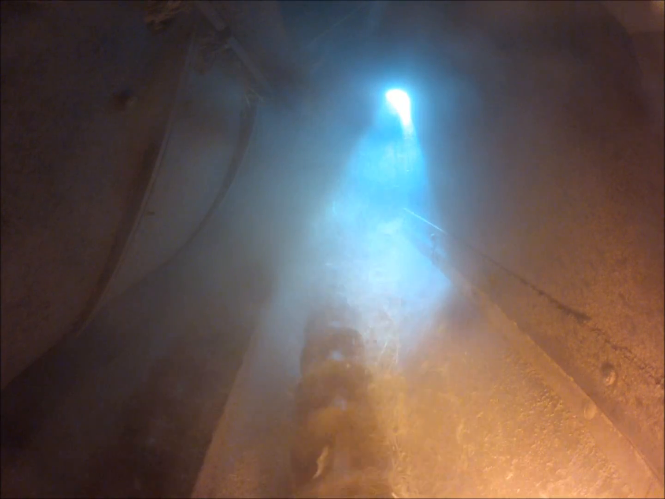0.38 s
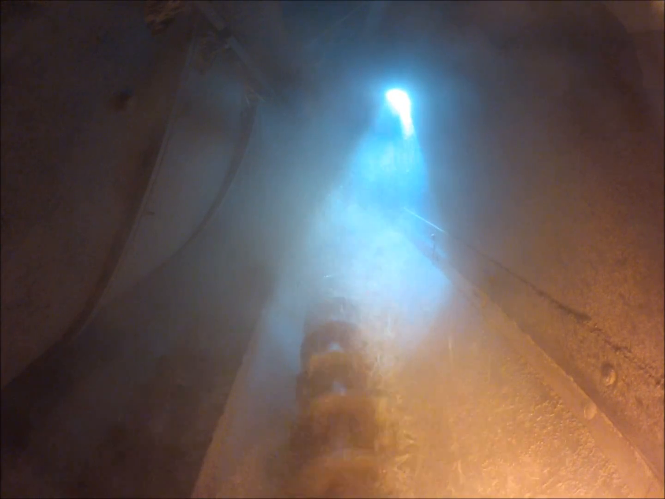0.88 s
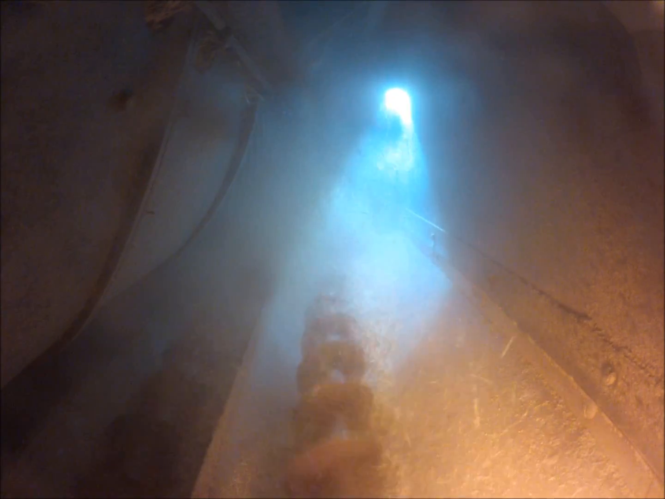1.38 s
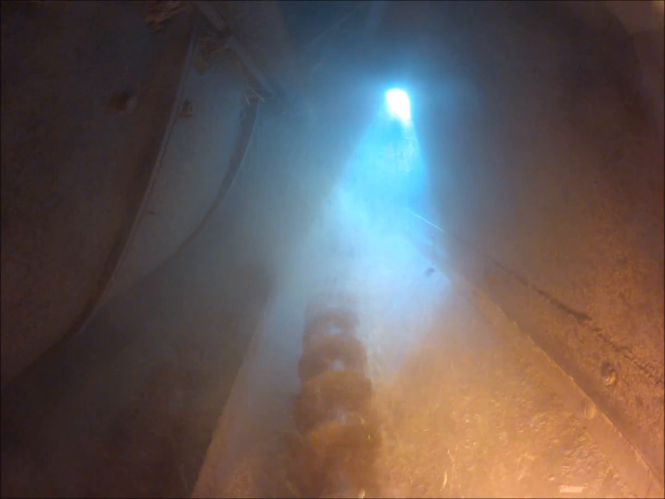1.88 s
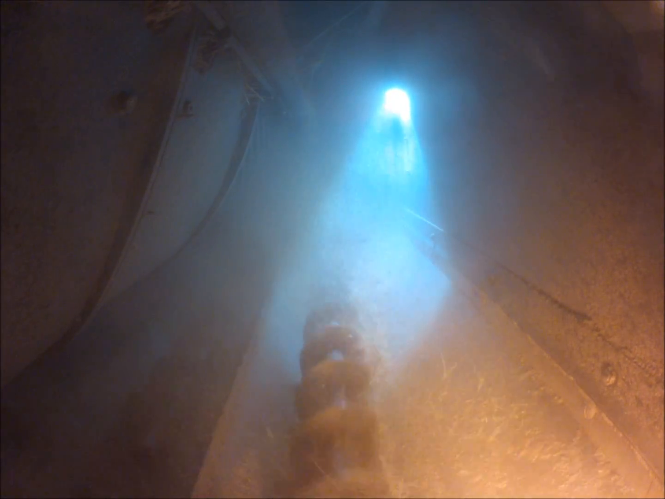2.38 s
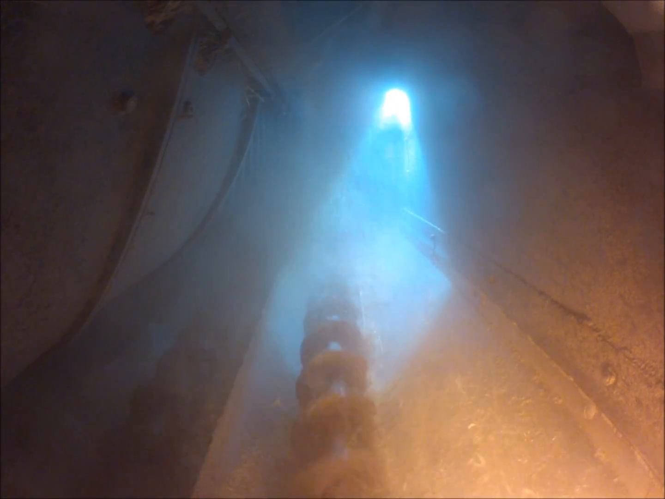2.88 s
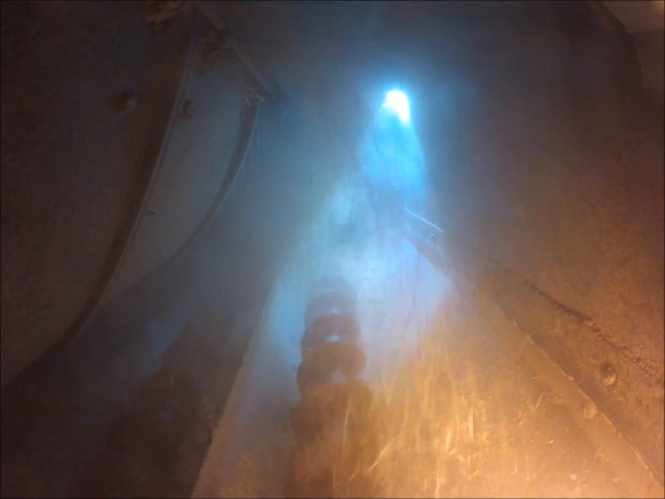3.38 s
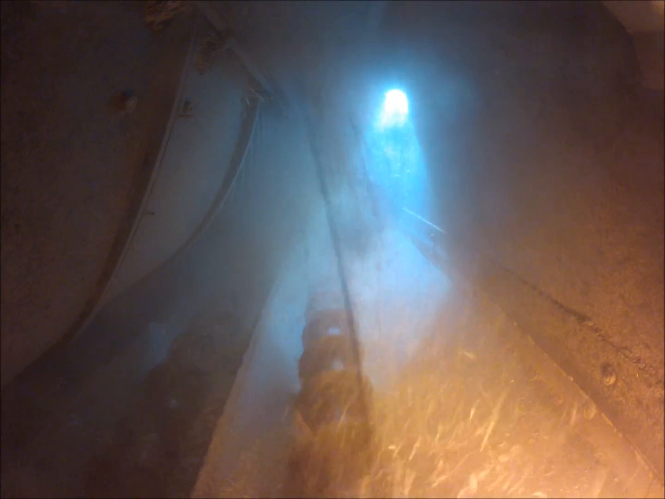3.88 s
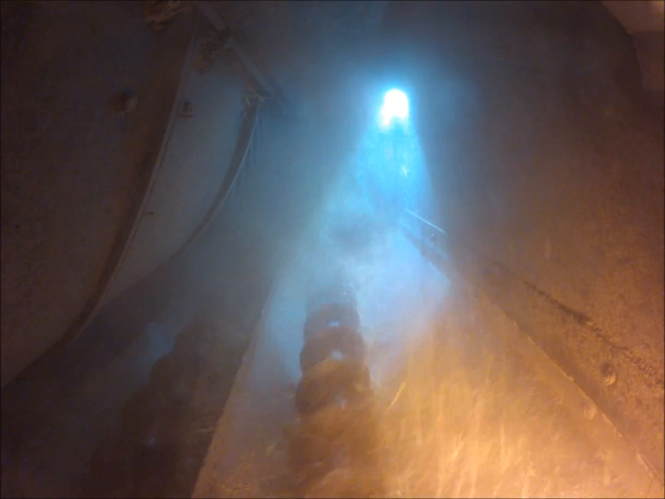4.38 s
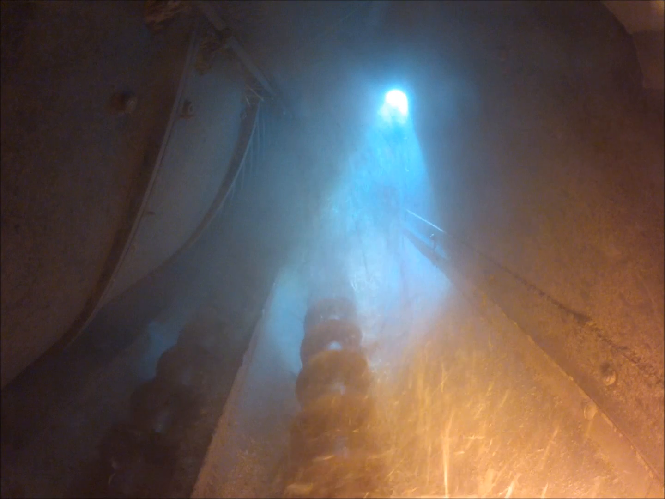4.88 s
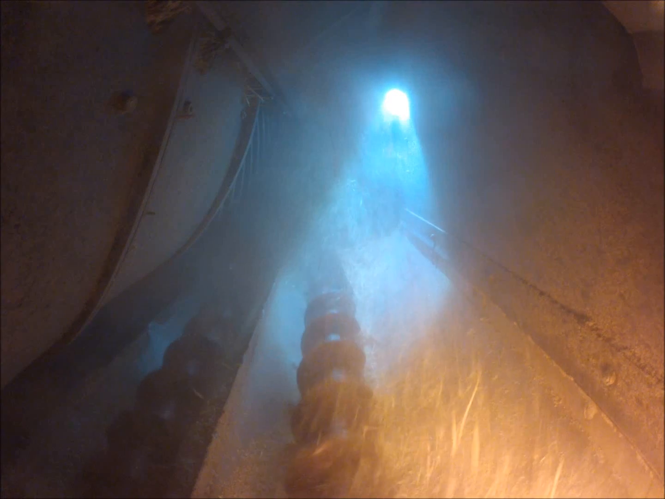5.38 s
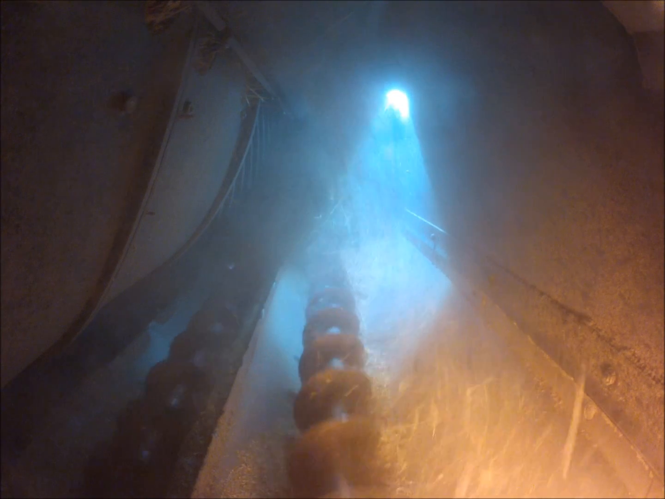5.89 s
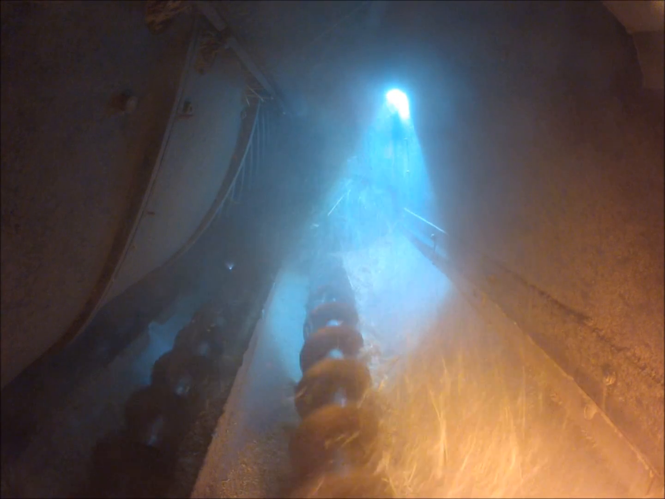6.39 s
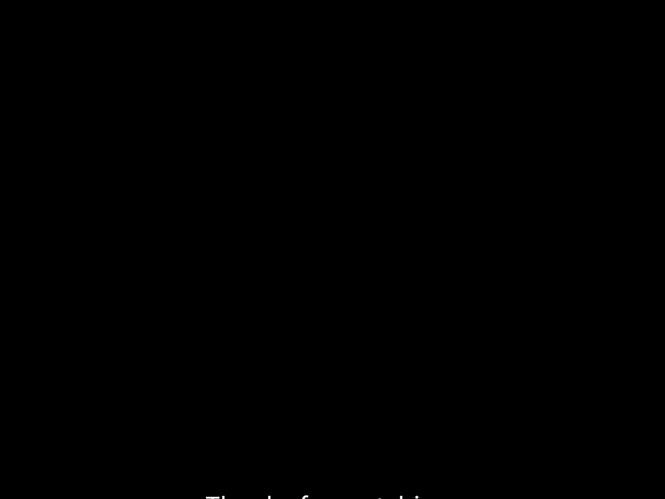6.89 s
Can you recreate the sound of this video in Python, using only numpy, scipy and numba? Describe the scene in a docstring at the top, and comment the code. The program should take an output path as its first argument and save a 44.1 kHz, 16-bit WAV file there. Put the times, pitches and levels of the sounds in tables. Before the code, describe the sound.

A small sealed microphone sits in a steel auger chamber, hearing a continuous boxy drone and a fine dry rain of chaff and grain. Single kernels crack hard against its housing, joined by several blunt overloaded blows early on. Level pumps down after hits and recovers. Gradually the patter weakens and the roar fades, dipping once near the end before cutting off.

```python
"""Inside a running thresher: a small sealed recorder starts at low gain, so the sound begins quiet.
Drum and augers drone through steel panels (shaped noise and wavering tones) and grain patters (ringing ticks).
Single kernels knock its housing hard, and a few heavier blows push all of it inward.
Its gain control ducks when peaks get too high, then creeps back up; 1/12000 s holds mirror sound into the treble.
A long fade begins at 1.72 s, patter weakens from 2.7 s, a hand-set gain duck comes near 6 s, and it stops."""
import sys
import numpy as np
from scipy import signal
from scipy.fft import rfft, irfft, next_fast_len
from scipy.io import wavfile
from scipy.ndimage import uniform_filter1d
from numba import njit

SR = 44100
rng = np.random.default_rng(int(sys.argv[2]) if len(sys.argv) > 2 else 0)


def attenuation_scalar(level_db):
    """Turn a level in dB into a linear amplitude multiplier (20 dB per decade)."""
    decades = np.asarray(level_db, float) / 20
    return 10 ** decades


def output_pcm(signal):
    """Save a mono or channel-first signal as 16-bit PCM at the path in sys.argv[1].

    Samples are clipped to [-1, 1] before scaling.
    """
    pcm = np.clip(np.atleast_2d(signal).T, -1, 1) * 32767
    wavfile.write(sys.argv[1], SR, np.round(pcm).astype(np.int16))


N = 309130
T = np.arange(N) / SR  # time in s


def unit(x):
    """Scale to rms 1."""
    return x / np.sqrt(np.mean(x ** 2))


def walk(rate_hz):
    """Random levels held 1 / rate_hz s, then smoothed twice into a gliding line of rms 1."""
    hold = int(SR / rate_hz)
    steps = np.repeat(rng.standard_normal(N // hold + 1), hold)
    smooth = uniform_filter1d(uniform_filter1d(steps, hold), hold)
    return unit(smooth[:N])


def shape(x, gain):
    """Weight the spectrum of x by gain(Hz)."""
    size = next_fast_len(N)
    hz = np.arange(size // 2 + 1) * SR / size + 1e-3  # just above 0, so that a logarithm works
    return irfft(rfft(x, size) * gain(hz), size)[:N]


def high_pass(x):
    """Let slow pressure or voltage leak away below 25 Hz."""
    return signal.sosfilt(signal.butter(1, 25, "high", fs=SR, output="sos"), x)


def drone(flutter_db=3):
    """Roar of drum and air coloured by the panels, with the wavering tones of shafts and gears."""
    # roar through the panels, before their resonances: pitch_hz, relative level_db per Hz
    roar_curve = [(20, -42), (48, -17.5), (92, -12.5), (114, -9), (165, -9), (235, -15.5), (280, -12.5),
                  (351, -14), (490, -25.5), (637, -18), (868, -24), (1150, -24.5), (1300, -30),
                  (1550, -32.5), (3000, -42), (5500, -43.5)]
    # panel and cavity resonances, a negative level being a dip: pitch_hz, width_hz, level_db
    panels = [(119.7, 29, 8.5), (713, 12, -1.5), (762.4, 63, 2.5), (1017, 99, 12.5), (2360, 1000, 7.5),
              (3536, 200, 8.5), (5270, 440, 2)]
    # shaft and gear tones: pitch_hz, usual rms level_db against the roar, waver_hz (rms)
    tone_table = [(118.94, -15, 6.), (787, -22, 0.97), (1066, -20, 2.3)]
    curve_hz, curve_db = np.transpose(roar_curve)

    def colour(f):
        """Broad slope times the panel peaks."""
        peaks_db = sum(peak_db / (1 + ((f - at_hz) / (width_hz / 2)) ** 2) for at_hz, width_hz, peak_db in panels)
        slope_db = np.interp(np.log(f), np.log(curve_hz), curve_db)
        return attenuation_scalar(slope_db + peaks_db)

    surge_db = 2.27 * walk(14)
    roar = unit(shape(rng.standard_normal(N) * attenuation_scalar(surge_db), colour))
    tones = 0
    for tone_hz, tone_db, waver_hz in tone_table:
        level = np.sqrt(2) * attenuation_scalar(tone_db + flutter_db * walk(25))
        phase = 2 * np.pi * np.cumsum(tone_hz + waver_hz * walk(12)) / SR
        tones = tones + level * np.sin(phase)
    return roar + tones


def spikes(start_s, size):
    """Single-sample strikes at the given times."""
    out = np.zeros(N, np.asarray(size).dtype)
    np.add.at(out, (np.asarray(start_s) * SR).astype(int), size)
    return out


def swell(x, rise_s):
    """Spread each strike over the short time of contact."""
    keep = np.exp(-1 / (rise_s * SR))
    return signal.lfilter([1 - keep], [1, -keep], x)


def ring(x, hz, t60_s):
    """One mode struck by x, falling 60 dB in t60_s; a complex strike sets its phase."""
    pole = np.exp((2j * np.pi * hz - np.log(1000) / t60_s) / SR)
    return signal.lfilter([1], [1, -pole], x).imag


def housing(start_s, size, spot_hz, scatter_db, reach_db, crack_db):
    """Each strike rings all modes, favouring those near its spot in pitch, and cracks for a few ms."""
    # ways the housing rings: pitch_hz, relative level_db, t60_s (time to fall 60 dB)
    modes = [(1030, -6.5, 0.03), (1770, -9, 0.02), (1930, -3, 0.017), (2130, -8, 0.02), (2340, -0.5, 0.013),
             (2960, -8.5, 0.025), (3350, -3, 0.01), (3780, -0.5, 0.0099), (4164, -10.5, 0.016),
             (4582, -6.5, 0.0066), (5170, -5, .008), (5600, -11.5, .006)]
    luck = rng.standard_normal((len(start_s), len(modes)))
    phase = np.exp(2j * np.pi * rng.random((len(start_s), len(modes))))
    rings = 0
    for k, (hz, mode_db, t60_s) in enumerate(modes):
        # reach_db is the loss per octave away from the spot's mode
        loss_db = np.clip(reach_db * np.abs(np.log2(hz / spot_hz)), 0, 11)
        share = attenuation_scalar(mode_db - loss_db + scatter_db * luck[:, k])
        turn = np.exp(2j * np.pi * hz * T)
        # the contact keeps feeding the mode in step, so the ring swells before it dies
        strike = swell(spikes(start_s, size * share * phase[:, k]), 0.00084) * turn
        rings = rings + ring(strike, hz, t60_s)
    crack = swell(swell(spikes(start_s, size), 0.0016), 0.0007) * rng.standard_normal(N)
    crack_band = signal.butter(2, [900, 5200], "band", fs=SR, output="sos")
    return rings + attenuation_scalar(crack_db) * signal.sosfilt(crack_band, crack)


def patter(count=24000):
    """Chaff and grain in a dense rain of light ticks on the housing, a few of them larger."""
    when, chance, spot = rng.random((count, 3)).T
    size = attenuation_scalar(-3.5 * np.log(chance + 1e-4))  # small chances make the few large ticks
    ticks = housing(when * T[-1], size, 1700 + 3500 * spot, scatter_db=3.5, reach_db=7.5, crack_db=30.0)
    return unit(ticks)


def knocks():
    """The single kernels that stand out as they hit and ring the housing."""
    # kernels on the housing: start_s, strike level_db before each mode's share,
    # spot_hz (pitch of the mode nearest the struck spot)
    kernels = [(0.079, 17.5, 2340), (0.087, 19, 3350), (0.104, 20, 1930), (0.3729, 23.5, 2960),
               (0.428, 21, 1770), (0.6884, 21, 3350), (0.9748, 23, 1930), (1.0489, 11, 1930),
               (1.0679, 12.5, 1930), (1.1383, 18, 2960), (1.1859, 14.5, 1770), (1.2195, 11.5, 2340),
               (1.247, 7, 1930), (1.2792, 33, 2340), (1.339, 25.5, 1930), (1.432, 32, 1930),
               (1.478, 8, 3350), (1.4931, 11, 2340), (1.5655, 26.5, 1930), (1.6134, 14.5, 2340),
               (1.6239, 23, 1930), (1.6745, 32.5, 2340), (1.8873, 21, 1930), (1.9217, 21, 2960),
               (1.9433, 30, 2340), (1.9854, 23, 1930), (2.073, 11.5, 1930), (2.078, 13.5, 3780),
               (2.09, 25, 2340), (2.118, 13, 3780), (2.156, 7.5, 2960), (2.1724, 11, 1770),
               (2.187, 16.5, 1030), (2.2239, 22, 2340), (2.2428, 25, 2340), (2.3036, 19, 3780),
               (2.366, 7.5, 1930), (2.3896, 38, 2340), (2.4963, 27, 1930), (2.511, 8, 1930),
               (2.5892, 8.5, 2340), (2.7017, 17, 2960), (2.7404, 19.5, 2340), (2.7452, 31.5, 2960),
               (2.787, 12.5, 2340), (2.8362, 20.5, 3780), (2.873, 23.5, 2340), (2.9093, 17.5, 1930),
               (2.94, 14, 2340), (2.966, 7, 1930), (2.9993, 14, 1770), (3.0077, 11, 2340),
               (3.069, 6.5, 2340), (3.1156, 11.5, 3780), (3.1498, 26.5, 3350), (3.1778, 15.5, 2340),
               (3.3049, 12.5, 2340), (3.3173, 19, 2340), (3.5335, 12, 1930), (3.6826, 8.5, 2340),
               (3.8348, 10.5, 3780), (3.9705, 17.5, 2340), (4.0553, 16.5, 1930), (4.1213, 15.5, 1930),
               (4.1955, 6.5, 1770), (4.4319, 10, 5150), (4.4382, 12, 2340), (4.492, 5, 1770),
               (4.6661, 7, 1770), (4.7337, 19, 1930), (4.844, 19.5, 1770), (4.9267, 8, 5150),
               (5.2043, 8, 1930), (5.4363, 8.5, 1770), (5.515, 6.5, 5150), (5.8777, 6.5, 1930),
               (6.259, 10, 1930)]
    start_s, level_db, spot_hz = np.transpose(kernels)
    return housing(start_s, attenuation_scalar(level_db), spot_hz, scatter_db=3.0, reach_db=40.5, crack_db=38)


def thumps():
    """A push of a few ms inward; the pressure leaks out of the housing and swings back."""
    # heavier blows that push the whole housing: start_s, push level_db before the leak, length_s
    blows = [(1.28, 31.5, 0.004), (1.5668, 22, 0.002), (1.6253, 26.5, 0.0027), (2.243, 18.5, 0.0013),
             (2.3901, 28.5, 0.0065), (2.7394, 10.5, 0.0022)]
    push = 0
    for start_s, level_db, length_s in blows:
        push = push - attenuation_scalar(level_db) * np.sin(np.pi * np.clip((T - start_s) / length_s, 0, 1))
    return high_pass(push)


def scene():
    """A single microphone feeds both channels; drone and patter share one level curve set by hand."""
    # overall level of drone and patter before the gain control: start_s, level_db (straight lines between)
    level_curve = [(0, -0.5), (0.199, 0.5), (.5, 0.5), (.9, -0.5), (1.098, -2.5), (1.4, -1), (1.6, -2.5),
                   (1.8, 7.5), (2.4, -1.5), (2.699, 4), (3.1, -1), (3.8, 2.5), (4.3, -1), (5.0, 1.5),
                   (5.5, 2.5), (6.1, 2.5), (6.6, -2)]
    start_s, level_db = np.transpose(level_curve)
    # grain against the roar; it weakens by 4 dB per second from 2.7 s on
    patter_db = -11.5 - 4 * np.clip(T - 2.7, 0, None)
    background = (drone() + patter() * attenuation_scalar(patter_db)) * attenuation_scalar(np.interp(T, start_s, level_db))
    # one more gain duck near 6 s, set by hand: sudden drop, then recovery
    duck_s, duck_db, recovery_s = 6.01, -10.5, 0.18
    background = background * attenuation_scalar(duck_db * (T > duck_s) * np.exp(-np.abs(T - duck_s) / recovery_s))
    return np.tile(background + knocks() + thumps(), (2, 1))


@njit
def gain_control(in_db, gain_db, top_db, max_db, rise, fall, watch, hold):
    """Lowers the gain at a limited rate when the output peaks over the top, waits, then creeps back up."""
    # rise and fall are in dB per sample, watch and hold in samples since the last peak over the top
    out, since = np.empty(len(in_db)), hold
    for i in range(len(in_db)):
        since = 0. if in_db[i] + gain_db > top_db else since + 1
        if since < watch:
            gain_db -= fall
        elif since > hold:
            gain_db = min(gain_db + rise, max_db)
        out[i] = gain_db
    return out


def sample_and_hold(x):
    """Coarse sampling mirrors the band around the hold rate; holding droops it and nulls that rate."""
    hold_hz = 12000
    x = signal.sosfilt(signal.cheby1(10, .1, 5740, fs=SR, output="sos"), x)
    mirrored = x * (1 + 2 * np.cos(2 * np.pi * hold_hz * T))
    return shape(mirrored, lambda f: np.sinc(f / hold_hz) / np.sinc(f / (4 * hold_hz)))


def band_limit(x):
    """A steep low-pass at the top of the band."""
    return signal.sosfilt(signal.butter(12, 16380, fs=SR, output="sos"), x)


def record(dry):
    """Gain control, overload, coarse sample-and-hold, fade, faint opposite residue and top cut."""
    start_db, top_db, max_db = -25, -1.5, -8.5
    rise_db_s, fall_db_s, watch_s, hold_s = 67.5, 2300.5, 0.00099, 0.011
    in_db = 20 * np.log10(np.abs(dry[0]) + 1e-9)
    gain_db = gain_control(in_db, start_db, top_db, max_db,
                           rise_db_s / SR, fall_db_s / SR, watch_s * SR, hold_s * SR)
    x = np.clip(dry[0] * attenuation_scalar(gain_db), -.85, .85)
    # the coupling capacitor lets a long overload swing back
    x = sample_and_hold(high_pass(x))
    fade = np.interp(T, (1.72, 6.765), [1, 0])
    end_s = 6.693
    stop = np.interp(T, [end_s - .01, end_s + .01], [1, 0])
    x = x * fade * stop
    # a faint rough residue, opposite in left and right: in the bass, and broadband while the gain falls
    bass = signal.sosfilt(signal.butter(1, 90, fs=SR, output="sos"), x * walk(150))
    falling = np.gradient(uniform_filter1d(gain_db, 200)) < -.02  # dB per sample
    residue = attenuation_scalar(-28.5) * bass + attenuation_scalar(-31) * x * walk(3000) * falling
    both = np.clip(x + np.outer([1, -1], residue), -.88, .88)
    mix = signal.sosfilt(signal.ellip(12, .2, 75, 15350, fs=SR, output="sos"), both)
    return band_limit(mix)


dry = scene()
out = record(dry)
output_pcm(out)
```